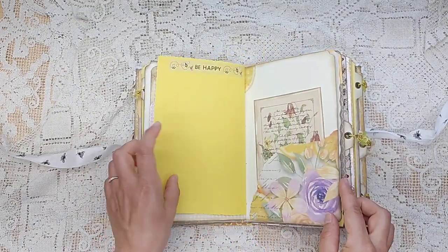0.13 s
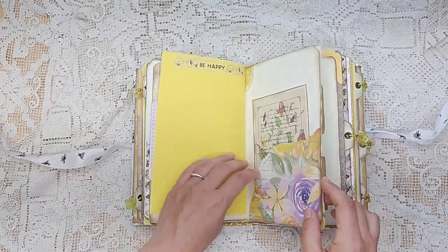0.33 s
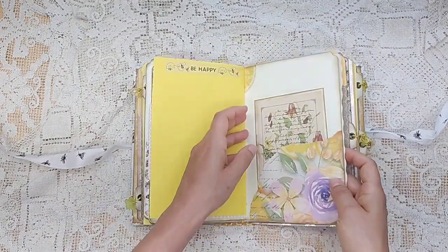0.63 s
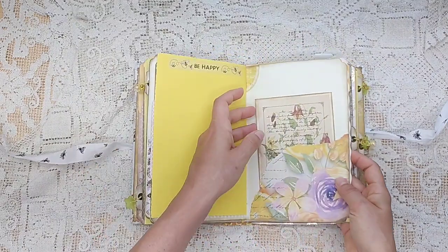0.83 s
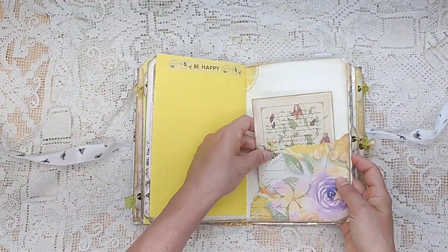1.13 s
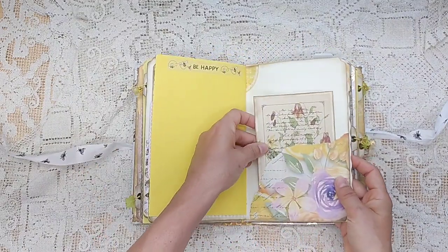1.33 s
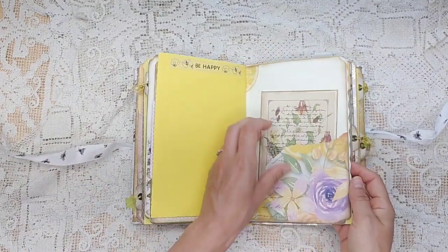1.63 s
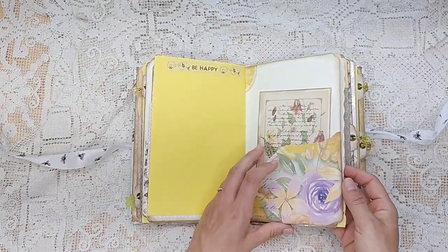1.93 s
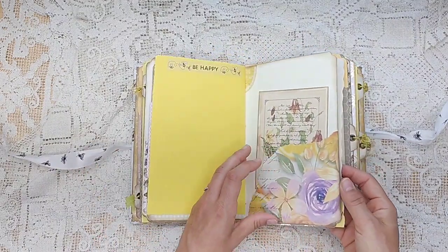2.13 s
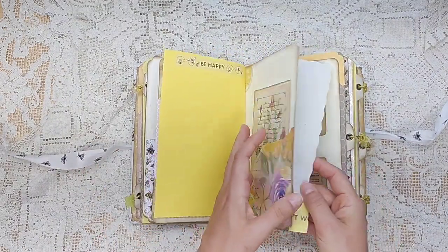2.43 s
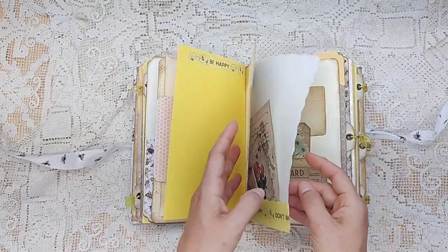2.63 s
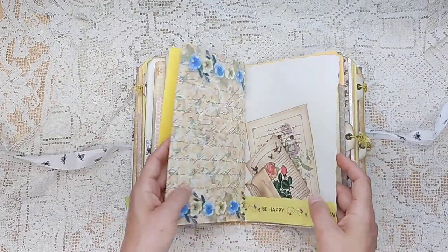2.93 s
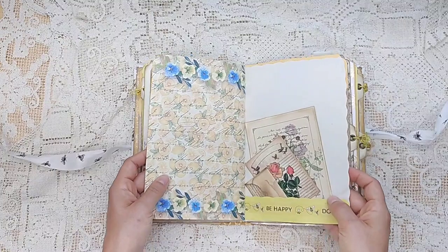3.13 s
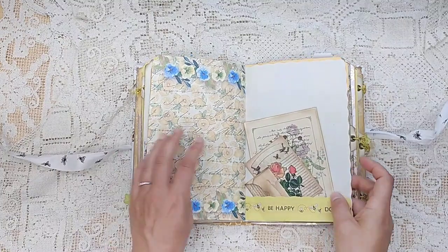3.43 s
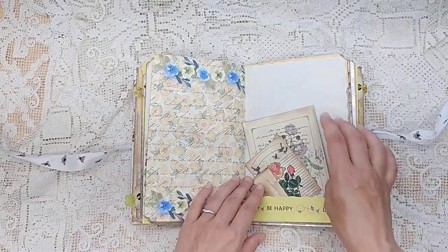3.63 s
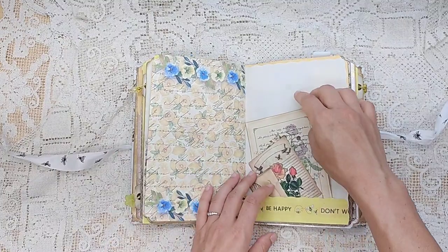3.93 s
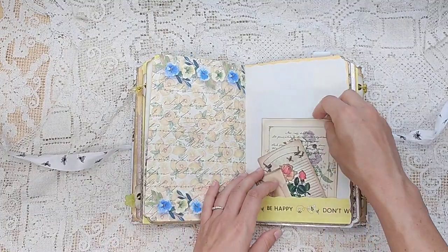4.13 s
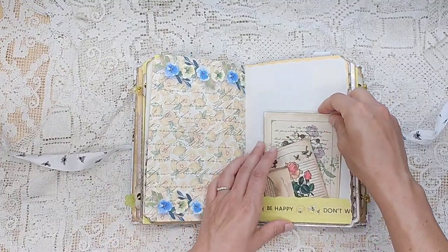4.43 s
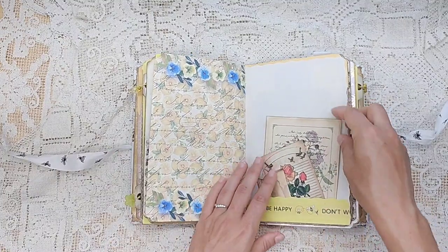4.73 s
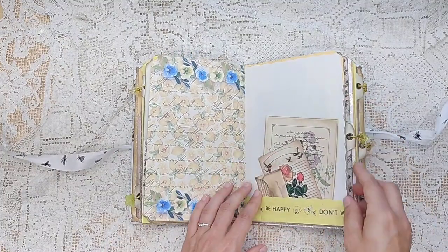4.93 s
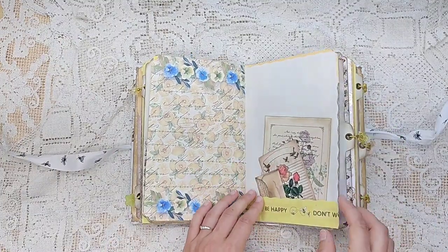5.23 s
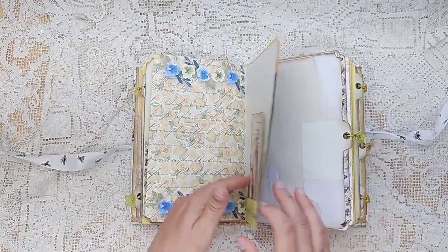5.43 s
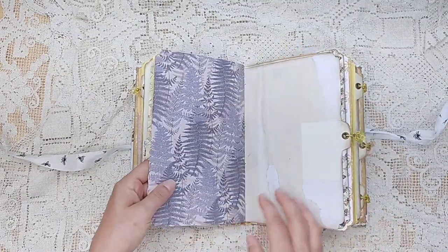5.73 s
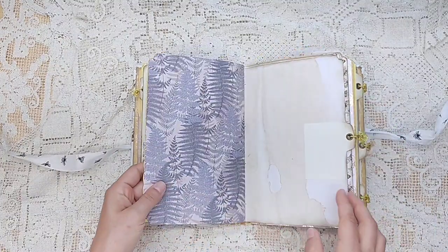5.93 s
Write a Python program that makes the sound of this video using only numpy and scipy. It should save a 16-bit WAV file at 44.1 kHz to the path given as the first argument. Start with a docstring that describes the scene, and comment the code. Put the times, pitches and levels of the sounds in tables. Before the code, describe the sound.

A small, quiet, dry room with faint hiss, low rumble and barely audible hum; stereo microphones close to a thick paper journal on a cloth-covered table. From 0 s a hand brushes stiff pages in short, grainy strokes with little edge taps, a firmer scrape at 0.33 s. Around 0.4-0.55 s displaced air makes a low, soft wobble. At 1.0 s a tucked card snaps with a hard, papery-woody click, buzzing and juddering briefly to 1.2 s. Soft rubs follow at 1.3 and 1.6 s, then near quiet. Crackly edge catches at 2.0 and 2.3-2.45 s lead to a heavy leaf whipping over at 2.63 s, a very short, bright, loud swish. Light taps and scuffs cluster at 3.2-3.55 s. From 3.7 s only faint brushing, with small taps near 4.5 and 4.8 s; almost still 5.1-5.4 s, then very soft rubs and ticks until 6 s.

```python
"""A hand rubs softly over stiff paper, then edges tap and catch: a thick handmade journal is leafed through
on a cloth-covered table, close to a stereo microphone in a small quiet room. Rubs and taps are dense random
clicks, filtered and combed by nearby bounces; a tucked card snaps as a set of ringing modes and judders on;
one heavy leaf whips over as swelling bands of such clicks. A passing hand puffs air at the microphone as a
low wobble, over shaped noise and a faint hum for the room."""
import sys
import numpy as np
from scipy import signal
from scipy.fft import rfft, irfft
from scipy.io import wavfile
from scipy.ndimage import uniform_filter1d

SR = 44100
rng = np.random.default_rng(int(sys.argv[2]) if len(sys.argv) > 2 else 0)


def waveform_to_disk(signal):
    """Save audio, clipped to [-1, 1], as 16-bit WAV at the path in sys.argv[1]."""
    frames = np.transpose(np.atleast_2d(signal))
    scaled = np.clip(frames, -1, 1) * 32767
    samples = np.round(scaled).astype(np.int16)
    wavfile.write(sys.argv[1], SR, samples)


N = 268877
TIME = np.arange(N) / SR  # s
FREQ = np.maximum(np.fft.rfftfreq(N, 1 / SR), 1)  # Hz

# Strokes of a hand or card over the paper. Each row: fastest moment in seconds, speeding up in seconds,
# slowing down in seconds, scrape level in dB, fibre hiss over the scrape in dB, page body over the scrape in dB.
HAND_STROKES = [(0.038, 0.044, 0.044, -53.5, 0.5, -14.5), (.11, .04, 0.046, -51.5, 9.5, -17),
                (.33, 0.043, 0.085, -43.5, -23, -15.5), (.385, 0.066, 0.076, -54, 4, -20),
                (.52, 0.068, 0.083, -53, -5, -10), (.68, 0.064, 0.083, -52.5, 2.5, -10.5),
                (0.851, 0.14, 0.079, -58, -2.5, 2), (.98, .008, 0.034, -55.5, -8.5, -1),
                (1.085, 0.056, 0.1, -52, 0, -5.5), (1.15, .04, 0.021, -51.5, -1.5, -1.5),
                (1.284, 0.037, 0.095, -57, -4.5, -2), (1.455, 0.049, 0.036, -62, -8, -13),
                (1.595, 0.067, 0.091, -51, 1.5, -7.5), (1.765, 0.069, 0.11, -65, 5.5, 1),
                (2.075, 0.022, 0.016, -59, 4.5, 1), (2.57, .11, 0.074, -46.5, -9.5, -10.5),
                (2.87, 0.053, 0.1, -63, -3.5, -5.5), (3.005, 0.034, 0.14, -62.5, -5.5, -5),
                (3.155, 0.03, 0.019, -58.5, 2.5, -0.5), (3.27, 0.044, 0.086, -61, -4.5, 1.5),
                (3.37, 0.032, 0.06, -47, 0.5, -7), (3.53, 0.1, 0.066, -51, 1, -5),
                (3.666, 0.05, 0.053, -64.5, 1.5, -1.5), (3.865, 0.028, 0.019, -66.5, 2, -3.5),
                (4.08, .17, 0.12, -66, 2.5, -1.5), (4.235, 0.058, 0.032, -65, 7.5, -4),
                (4.343, 0.029, 0.049, -57.5, 0.5, -9), (4.502, 0.024, 0.012, -60, 1, 3),
                (4.61, 0.031, 0.033, -64, 7, -5), (4.82, 0.082, 0.076, -64.5, 3.5, -0.5),
                (4.985, 0.07, 0.067, -63.5, 0, -1.5), (5.465, 0.048, 0.039, -70.5, 7.5, -3),
                (5.62, 0.081, 0.11, -67, 3, -0.5), (5.85, 0.098, 0.066, -66.5, -2.5, -12)]
# Spans in which the fidgeting fingers hold still. Each row: start in seconds, end in seconds.
FINGERS_STILL = [(.2, .27), (2.76, 2.81), (5.08, 5.38)]
# Colour of the scrape over stiff paper. Each row: frequency in Hz, relative level in dB.
SCRAPE_COLOUR = [(700, -27), (1400, -15.5), (1900, 0.5), (2600, 0), (3100, -1.5), (4100, 2.5), (5500, -11),
                 (9000, -30)]
# Colour of the hiss in the paper fibres. Each row: frequency in Hz, relative level in dB.
HISS_COLOUR = [(2500, -22.5), (4500, -6.5), (6000, 0.5), (7500, -1.5), (10000, -7.5), (13000, -9.5),
               (15500, -14.5)]
# Colour of the drumming page body. Each row: frequency in Hz, relative level in dB.
BODY_COLOUR = [(120, -28), (250, -5.5), (400, -1.5), (600, -3), (950, -4), (1500, -7), (2300, -14),
               (4000, -33)]
# Resonances of the stacked pages. Each row: frequency in Hz, width in Hz, level over the drive in dB.
STACK_MODES = [(350, 66, -3), (590, 100, 4), (754, 87, -6), (1114, 74, 6), (1500, 67, 9), (1880, 83, -1.5),
               (2540, 92, -14.5)]
# Edges and fingertips that land or catch. Each row: start in seconds, scuff length in seconds,
# crackle level in dB before its trim, crackle centre in Hz, thud of the book in dB before its trim.
EDGE_TAPS = [(0.138, 0.025, -45, 2210, -53), (0.431, 0.017, -60, 1790, -53.5),
             (0.529, 0.018, -46, 2290, -50.5), (0.711, 0.019, -50, 2150, -53.5),
             (0.775, 0.042, -51.5, 1380, -46.5), (0.806, 0.037, -52, 745, -51),
             (0.843, .014, -46, 5130, -47), (1.116, 0.012, -53, 1700, -47), (1.628, .012, -60, 5000, -47.5),
             (2.006, 0.0087, -49, 1460, -52), (2.014, 0.02, -42.5, 1240, -54),
             (2.295, 0.029, -42, 4380, -51.5), (2.403, .016, -44.5, 2620, -52.5),
             (2.416, 0.023, -41.5, 2130, -45), (2.439, 0.02, -43.5, 1630, -61),
             (2.513, .018, -49, 3300, -63), (2.574, 0.014, -48, 3770, -70), (2.83, 0.019, -55.5, 5430, -60),
             (2.88, 0.018, -58, 1610, -52.5), (3.179, 0.018, -60.5, 1810, -53),
             (3.236, 0.032, -49, 2030, -45.5), (3.295, 0.02, -56.5, 900, -54.5),
             (3.353, 0.021, -47.5, 3600, -52.5), (3.413, 0.018, -53, 1240, -47.5),
             (3.531, 0.02, -47, 3740, -65), (4.5, 0.0077, -52.5, 2180, -51),
             (4.673, 0.013, -58.5, 4180, -75), (4.802, 0.02, -48.5, 1240, -56.5),
             (4.824, 0.014, -52.5, 1600, -50.5), (5.001, 0.012, -62, 3600, -79),
             (5.164, .014, -70.5, 1530, -63.5), (5.458, 0.016, -67, 2180, -57.5),
             (5.629, 0.023, -56.5, 2100, -54), (5.683, 0.021, -55.5, 2510, -54),
             (5.98, 0.0066, -70.5, 1530, -59.5)]
# Colour of the thud into the book. Each row: frequency in Hz, level in dB.
THUD_COLOUR = [(70, -25.5), (200, -15.5), (350, -5), (560, -1), (800, -3), (1300, -18.5), (3000, -33.5)]
# The broad flexing of the whipping leaf, then its edge. Each row: peak time in seconds, peak level in dB,
# centre in Hz, width in octaves, rise in dB per second, fall in dB per second.
WHIP_BANDS = [(2.628, -40, 444, 0.98, 1298.5, 649), (2.635, -29, 1330, 0.73, 750, 598),
              (2.638, -19, 2680, 1.03, 901.5, 469.5), (2.637, -24.5, 4250, 1.08, 795.5, 479.5),
              (2.635, -33.5, 7360, 1.01, 699, 540.5)]
# Resonances of the leaf in flight. Each row: frequency in Hz, width in Hz, level over the drive in dB.
FLYING_LEAF_MODES = [(350, 34, -9.5), (545, 70, 1), (955, 60, 3.5), (1100, 50, -3), (1330, 37, -2.5),
                     (1863, 49, -5), (2130, 70, -8.5), (2330, 35, -10.5), (2600, 130, -3), (3460, 75, -10),
                     (6160, 140, -5)]
# Modes of the snapping card, struck as the bend runs out to its edge. Each row: frequency in Hz,
# delay in seconds, rise in seconds, 60 dB decay time in seconds, level in dB.
SNAP_MODES = [(569, 0.00072, 0.0011, 0.064, -37.5), (726, 0.00238, .001, 0.061, -43.5),
              (1134, 0.0048, 0.0012, 0.035, -28.5), (1360, 0.00423, 0.00078, 0.028, -32),
              (1512, 0.00085, 0.0017, 0.033, -14.5), (1706, 0.00089, .001, 0.027, -27.5),
              (2064, 0.0071, 0.0019, 0.043, -28.5), (2276, .005, .001, 0.024, -17.5),
              (2520, .005, 0.00062, 0.028, -16.5), (2760, .0052, .001, 0.02, -24)]
# Strength of the air puff at the microphone. Each row: time in seconds, level in dB.
PUFF_LEVEL = [(.28, -93), (.36, -62), (.40, -45.5), (.46, -43), (.52, -49.5), (.58, -55.5), (.68, -62),
              (.85, -82)]
# Colour of the room air and microphone hiss. Each row: frequency in Hz, relative density in dB per Hz.
ROOM_COLOUR = [(20, -6.5), (42, -1.5), (65, -4), (95, -9), (130, -5.5), (180, -15.5), (300, -18),
               (600, -20.5), (1200, -23.5), (3000, -26.5), (7000, -36), (11000, -33), (15500, -30)]
# How alike the two microphones hear the sound. Each row: frequency in Hz, likeness (used within 0 to 1).
MICROPHONE_LIKENESS = [(40, 1.08), (300, 0.35), (600, 0.52), (1400, 0.15), (2500, -0.05), (5000, -0.95),
                       (12000, -0.46)]
# Balance of the two microphones. Each row: frequency in Hz, left minus right in dB.
LEFT_RIGHT_BALANCE = [(100, 0), (600, 0), (1100, -2.5), (1600, 0), (2600, -2), (4000, -3), (6500, -2),
                      (10000, 4.5), (15000, 0)]

STROKE_END_DB, STROKE_CURVE = -10.5, 1.7  # level at the end of each rise or fall, and power of its curve
FIDGET_DB, FIDGET_HISS_DB, FIDGET_BODY_DB = -74.5, -3.5, -2.5  # scrape; hiss and body over the scrape
RING_SHARE = .93  # pitch at which the held sheet rings, as a share of the crackle's centre
SNAP_S = .9907
PUFF_HZ, PUFF_WANDER_HZ = 44.4, 4
ROOM_TONE_DB, HUM_HZ, HUM_DB = -66, 122, -77
ROOM_T60_S, ROOM_DB = 0.15, -16
LEFT_LEAD_S = .00007  # the sound reaches the left microphone this much sooner
TOP_HZ = 15900


def rubbing(palm_db=-1.5, fingers_db=-6.5):
    """Palm and fingertips slide together at two separate spots of the paper."""
    motion = hand_motion()
    palm = sliding_contact(motion)
    fingers = sliding_contact(motion)
    return palm * undb(palm_db) + fingers * undb(fingers_db)


def hand_motion(wander_db=2):
    """Gains of scrape, hiss and page body: strokes swell and fade over a faint fidgeting of the fingers."""
    still = sum((TIME > start) & (TIME < end) for start, end in FINGERS_STILL)
    moving = uniform_filter1d(1. - still, size=SR // 20)
    fidget = moving * undb(FIDGET_DB + wander_db * walk(9))
    power = np.outer(undb([0, FIDGET_HISS_DB, FIDGET_BODY_DB]), fidget) ** 2
    for s, rise, fall, db, hiss_db, body_db in HAND_STROKES:
        near = (TIME > s - 3 * rise) & (TIME < s + 3 * fall)
        away = np.maximum((s - TIME[near]) / rise, (TIME[near] - s) / fall)
        swell = undb(db + STROKE_END_DB * away ** STROKE_CURVE)
        power[:, near] += np.outer(undb([0, hiss_db, body_db]), swell) ** 2
    return np.sqrt(power)


def sliding_contact(motion, judder_db=1.9, grip_db=1.87, snag_share=0.36):
    """Slips rasp the surface, hiss in the fibres and drum on the page; coarse fibres snag, the grip is uneven."""
    scrape_gain, hiss_gain, body_gain = motion
    grip = undb(judder_db * walk(170) + grip_db * walk(45) - 0.66)
    snags = snag_share * unit(slips(per_s=420, spread_db=1.5))
    rasp = unit(slips(per_s=7000, spread_db=2.5)) + snags
    fibres = unit(slips(per_s=15000, spread_db=2.5)) + snags
    drumming = slips(per_s=1800, spread_db=3.5)

    scrape = unit(ringing(shape(rasp, undb(over_hz(SCRAPE_COLOUR))), STACK_MODES))
    hiss = touch(unit(shape(fibres, undb(over_hz(HISS_COLOUR)))), hiss_gain)
    body = unit(ringing(shape(drumming, undb(over_hz(BODY_COLOUR))), STACK_MODES))
    contact = scrape * scrape_gain + hiss * hiss_gain + body * body_gain
    return moving_bounces(grip * contact)


def touch(hiss, gain, top_hz=9300, even_db=-57, fineness=0.17):
    """A light touch hisses finer than a firm one: the top of the hiss grows less than the rest."""
    top = shape(hiss, 1 / (1 + (top_hz / FREQ) ** 8))
    top_gain = np.minimum((gain / undb(even_db) + 1e-9) ** -fineness, 2)
    return hiss + top * (top_gain - 1)


def taps(octaves=1.48, ring_width_hz=90, ring_db=-6, tick_db=-13, crackle_trim_db=-2, thud_trim_db=-9):
    """Each landing edge ticks, crackles, rings the sheet near the crackle's centre, and thuds into the book."""
    crackles, thuds = np.zeros((2, N)), np.zeros((2, N))
    for s, length, db, hz, thud_db in EDGE_TAPS:
        push = bounces(scuff(length), t60_s=0.0068, direct=0.81)
        tick = unit(band(push, hz=2500, octaves=2.6))
        crackle = unit(band(push, hz, octaves))
        ring_hz = RING_SHARE * hz
        b, a = signal.iirpeak(ring_hz, ring_hz / ring_width_hz, fs=SR)
        ring = unit(signal.lfilter(b, a, band(push, ring_hz, 1.0)))
        fill = np.sqrt(length * SR / push.shape[1])  # the energy sits within the scuff's length
        touchdown = crackle + undb(ring_db) * ring + undb(tick_db) * tick
        add(crackles, s, touchdown * fill * undb(db))
        thud = push / np.std(band(push, hz=534, octaves=1.1))
        add(thuds, s, thud * fill * undb(thud_db))
    thuds = ringing(shape(thuds, undb(over_hz(THUD_COLOUR))), STACK_MODES)
    return crackles * undb(crackle_trim_db) + thuds * undb(thud_trim_db)


def scuff(length, contact=.42, release_s=0.0034):
    """One contact: a sharp first touch, then slips that die as the edge settles."""
    t = TIME[:SR // 8]
    release = 1 + np.exp(np.minimum((t - length) / release_s, 50))
    pressure = np.exp(-.7 * t / length) / release
    push = slips(per_s=7000, spread_db=2.0, size=len(t)) * pressure
    push[0] += contact * np.sqrt(np.sum(push ** 2))
    return push


def leaf_whip(crest_s=0.0044):
    """The stiff leaf scrapes over its neighbour in a steep swell, springs free and swishes out."""
    out = np.zeros((2, N))
    for s, db, hz, octaves, rise, fall in WHIP_BANDS:
        away = np.hypot(TIME - s, crest_s) - crest_s  # a rounded crest
        swell = undb(db - away * np.where(TIME < s, rise, fall))
        one_edge = bounces(slips(per_s=16000, spread_db=1.5), t60_s=.04, direct=0.27)
        other_edge = bounces(slips(per_s=16000, spread_db=1.5), t60_s=.04, direct=0.27)
        out += swell * unit(ringing(band(one_edge + other_edge, hz, octaves), FLYING_LEAF_MODES))
    return out


def card_snap(flutter_db=-37, flutter_t60_s=0.19):
    """A bent card springs flat: its modes swell and ring briefly, and its edge buzzes against the page."""
    out = np.zeros((2, N))
    t = TIME[:SR // 4]
    for hz, delay, rise, t60, db in SNAP_MODES:
        onset = np.sin(np.pi / 2 * np.minimum(t / rise, 1)) ** 2
        ring = onset * undb(db - 60 * t / t60)
        skew = np.array([[.5], [-.5]]) * hz / 5000  # higher modes reach the two sides out of step
        add(out, SNAP_S + delay, ring * np.sin(2 * np.pi * hz * t + skew))
    buzz = bounces(slips(per_s=6000, spread_db=2, size=len(t)))
    flutter = unit(band(buzz, hz=2090, octaves=1.12))
    add(out, SNAP_S + .005, flutter * undb(flutter_db - 60 * t / flutter_t60_s))
    return out


def card_drag(middle_s=1.107, spread_s=0.053, hz=1505, width_hz=110, judder_db=3, db=-49):
    """The released card judders on over the page, its slips sounding its strongest mode."""
    song = unit(shape(slips(per_s=700, spread_db=1.0), resonance(hz, width_hz) ** 2))
    stroke = np.exp(-.5 * ((TIME - middle_s) / spread_s) ** 4)
    return song * stroke * undb(db + judder_db * walk(119.4))


def air_puff():
    """Air pushed by the hand sets off a low, uneven wobble, alike at both microphones."""
    s, db = np.transpose(PUFF_LEVEL)
    phase = 2 * np.pi * np.cumsum(PUFF_HZ + PUFF_WANDER_HZ * walk(25)) / SR
    eddies = unit(band(rng.standard_normal(N), hz=43, octaves=2.2))
    wobble = 0.77 * np.sin(phase) + .5 * eddies
    return wobble * undb(np.interp(TIME, s, db))


def bounces(x, t60_s=.028, direct=0.41):
    """Direct sound, then bounces off leaves, hands and table that comb it, differently for each side."""
    t = TIME[:2048]
    paths = rfft(rng.standard_normal((2, len(t))) * undb(-60 * t / t60_s))
    paths /= np.sqrt(uniform_filter1d(np.abs(paths) ** 2, size=36, axis=1))  # ripples, but no overall colour
    paths = (direct + paths) / np.hypot(direct, 1)
    response = irfft(paths)[:, :len(t) // 2]
    return signal.fftconvolve(x[None], response, axes=1)[:, :len(x)]


def moving_bounces(x):
    """As the hand travels, one pattern of bounces gives way to the next."""
    hop = int(.2 * SR)
    fade = np.sin(np.pi * np.arange(2 * hop) / (2 * hop))
    padded = np.pad(x, (hop, 2 * hop))
    out = np.zeros((2, len(padded)))
    for start in range(0, N + hop, hop):
        out[:, start:start + 2 * hop] += bounces(padded[start:start + 2 * hop] * fade)
    return out[:, hop:hop + N]


def ringing(x, modes):
    """Stiff paper rings along with whatever drives it."""
    return shape(x, 1 + sum(undb(db) * resonance(hz, width) for hz, width, db in modes))


def two_ports(x):
    """Long waves reach both microphones alike, short ones differently."""
    alike = np.clip(over_hz(MICROPHONE_LIKENESS), 0, 1)
    mid = shape(x[0] + x[1], np.sqrt(1 + alike) / 2)
    side = shape(x[0] - x[1], np.sqrt(1 - alike) / 2)
    return np.array([mid + side, mid - side])


def room(x, first_echo_s=0.0029):
    """Table and near walls return a short diffuse tail."""
    t = TIME[:SR // 2]
    diffuse = band(rng.standard_normal((2, len(t))), hz=1685, octaves=5.66)
    tail = diffuse * undb(-60 * t / ROOM_T60_S) * (t > first_echo_s)
    tail = unit(tail) / np.sqrt(len(t))  # unit energy for each side
    return x + undb(ROOM_DB) * signal.fftconvolve(x, tail, axes=1)[:, :N]


def room_tone():
    """Low steady rumble, a faint hum and microphone hiss, all from filtered noise."""
    air = unit(two_ports(shape(rng.standard_normal((2, N)), undb(over_hz(ROOM_COLOUR)))))
    hum = unit(shape(rng.standard_normal(N), resonance(HUM_HZ, width_hz=15) ** 2))
    return air * undb(ROOM_TONE_DB) + hum * undb(HUM_DB)


def slips(per_s, spread_db, size=N):
    """Fibres catching and letting go: dense clicks of uneven size."""
    happens = rng.random(size) < per_s / SR
    strength = happens * undb(spread_db * np.minimum(rng.exponential(size=size), 4))
    return strength * rng.standard_normal(size)


def walk(rate):
    """Smooth random wander with a spread near 1, drawn afresh `rate` times a second."""
    knots = np.arange(0, N / SR + 1, 1 / rate)
    return np.interp(TIME, knots, rng.standard_normal(len(knots)))


def resonance(hz, width_hz):
    """Response of one damped mode, gain 1 at its centre."""
    return 1 / (1 + 1j * (FREQ ** 2 - hz ** 2) / (FREQ * width_hz))


def band(x, hz, octaves):
    """Causal band-pass around a centre."""
    edges = np.clip(hz * 2 ** (np.array([-.5, .5]) * octaves), 20, .45 * SR)
    return signal.sosfilt(signal.butter(3, edges, "band", fs=SR, output="sos"), x)


def shape(x, gain):
    """Filter by a gain per frequency."""
    return irfft(rfft(x) * gain, N)


def over_hz(points, freq=FREQ):
    """Join (Hz, value) points on a log-frequency axis."""
    hz, value = np.transpose(points)
    return np.interp(np.log(freq), np.log(hz), value)


def undb(db):
    """Decibels to gain."""
    return 10 ** (np.asarray(db) / 20)


def unit(x):
    """Scale to rms 1."""
    return x / np.sqrt(np.mean(x ** 2))


def add(track, s, sound):
    """Mix a short stereo sound in at a time in seconds."""
    start = int(s * SR)
    track[:, start:start + sound.shape[1]] += sound[:, :N - start]


def scene():
    """The book lies a little nearer the left microphone; its tilted leaves throw some bands to the right."""
    paper = two_ports(rubbing() + taps() + leaf_whip()) + card_snap() + card_drag()
    sides = np.array([[.5], [-.5]])  # left, right
    level = undb(sides * over_hz(LEFT_RIGHT_BALANCE))
    lead = np.exp(2j * np.pi * FREQ * sides * LEFT_LEAD_S)
    return room(shape(paper, level * lead)) + air_puff() + room_tone()


def record(dry):
    """The recorder cuts the top with a steep low-pass."""
    return signal.sosfilt(signal.ellip(10, .2, 80, TOP_HZ, fs=SR, output="sos"), dry)


dry = scene()
out = record(dry)
waveform_to_disk(out)
```